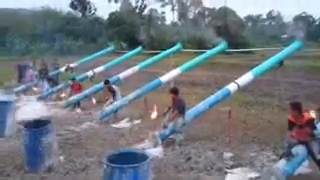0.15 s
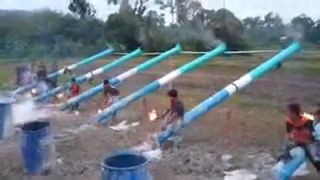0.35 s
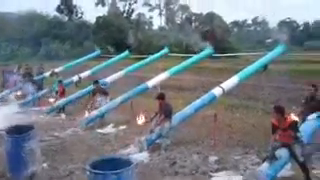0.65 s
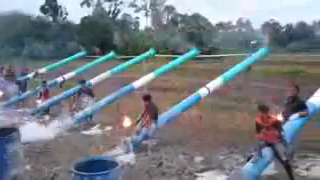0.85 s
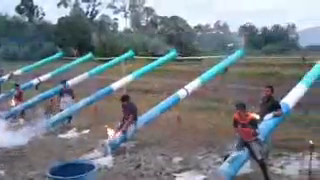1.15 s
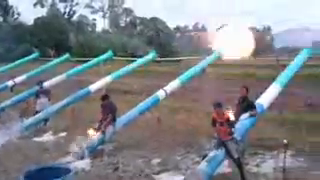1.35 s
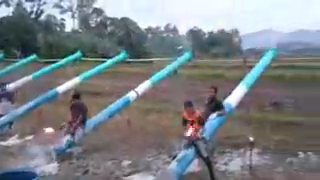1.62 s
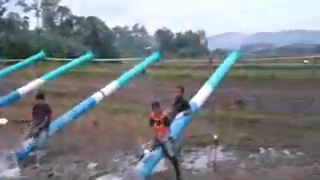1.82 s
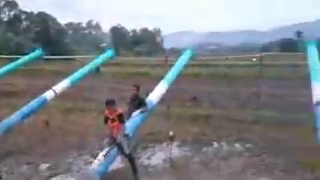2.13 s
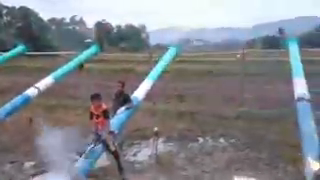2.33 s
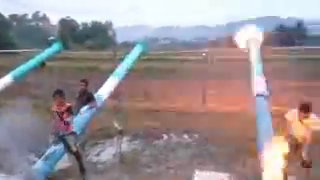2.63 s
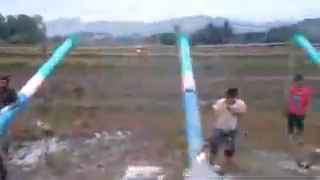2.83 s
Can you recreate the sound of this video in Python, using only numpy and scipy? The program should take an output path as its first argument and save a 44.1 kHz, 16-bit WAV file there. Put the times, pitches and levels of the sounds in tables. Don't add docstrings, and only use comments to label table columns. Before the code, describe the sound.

Booming shots from a row of homemade cannons, with sharp cracks, hissing ignition and rolling echoes outdoors.

```python
import sys
import numpy as np
from scipy import signal
from scipy.fft import rfft, irfft
from scipy.io import wavfile
from scipy.ndimage import uniform_filter1d

SR = 44100
rng = np.random.default_rng(int(sys.argv[2]) if len(sys.argv) > 2 else 0)


def volts_from_db(level):
    exponent = np.asarray(level, float) / 20
    return 10 ** exponent


def dump_mix(stems):
    frames = np.atleast_2d(stems).T
    limited = np.clip(frames, -1, 1)
    pcm = np.round(limited * 32767).astype(np.int16)
    wavfile.write(sys.argv[1], SR, pcm)


N = 131418

# f/Hz, level/dB per Hz
FIELD_SPECTRUM = [(260, -34), (450, -8), (523, -7.5), (1510, -14.5), (4010, -17), (6640, -21), (9090, -19),
                  (11800, -47.5), (20000, -120)]
# f/Hz, level/dB per Hz
RUMBLE_SPECTRUM = [(15, -45), (25, -6.5), (107, 5.5), (131, -8), (152, -4.5), (230, -20), (254, -34),
                   (284, -39.5), (500, -28), (650, -44.5), (1100, -120)]
# t/s, level/dB
RUMBLE_LEVEL = [(0, -16), (.17, -24.5), (.3, -24), (.45, -21.5), (.8, -23.5), (.95, -19), (1.15, -27),
                (1.3, -24), (1.53, -19), (1.72, -24.5), (1.86, -23.5), (2.18, -19), (2.36, -26.5),
                (2.42, -20), (2.6, -27), (2.8, -18.5), (2.98, -26)]
# t/s, peak level/dB, f/Hz, length/s
BOOMS = [(0.0409, -7, 108, 0.005), (0.0607, -11, 104, 0.0039), (0.1044, -4.5, 112, 0.0082),
         (0.1187, -10, 130, 0.0082), (0.1399, -8, 104, 0.0057), (0.3744, -13.5, 90, 0.0067),
         (0.4023, -15, 99, 0.0096), (0.4433, -14.5, 94, 0.0088), (0.4752, -6, 97, 0.0067),
         (0.4936, -8.5, 99, 0.0027), (0.5123, -5.5, 92, 0.0067), (0.5297, -15, 114, 0.0039),
         (0.6027, -12, 104, 0.01), (0.6402, -10.5, 97, 0.005), (0.6837, -12, 107, 0.019),
         (0.7401, -16.5, 112, 0.052), (0.773, -10, 94, 0.008), (0.9663, -15, 98, 0.0063),
         (1.0001, -16, 110, 0.0036), (1.0126, -6, 116, 0.0084), (1.0591, -13.5, 112, 0.014),
         (1.1792, -14, 98, 0.0099), (1.2495, -17, 106, 0.0061), (1.3641, -10, 118, 0.0074),
         (1.391, -11, 101, 0.0027), (1.4305, -3.5, 99, 0.005), (1.4975, -8.5, 97, 0.0039),
         (1.5304, -21, 92, 0.0032), (1.5632, -10, 116, 0.0048), (1.5948, -10.5, 112, 0.0035),
         (1.6211, -7, 122, 0.013), (1.8962, -13, 104, 0.0096), (2.0406, -3.5, 102, 0.0052),
         (2.0691, -10.5, 94, 0.02), (2.1778, -9, 100, 0.009), (2.2685, -8.5, 88, 0.0057),
         (2.3194, -8.5, 98, 0.0062), (2.3578, -10.5, 93, 0.0087), (2.4772, -7.5, 121, 0.015),
         (2.6373, -13, 114, 0.0079), (2.8947, -12, 133, 0.0092), (2.9196, -4.5, 122, 0.0047)]
# t/s, level/dB, hold/s
VOLLEYS = [
    (0.001, -45, .02),
    (.56, -43, 0.2),
    (1.38, -44.5, 0.037),
    (2.149, -36, 0.24),
    (2.722, -33, 0.067),
]
# f/Hz, level/dB per Hz
ECHO_SPECTRUM = [(180, -30), (300, -8), (677, -2.5), (1290, -9.5), (1420, -10.5), (2210, -10), (7440, -21),
                 (8590, -34), (9090, -51), (11800, -83), (20000, -120)]
# t/s, peak level/dB, f/Hz
POPS = [(0.003, -8.5, 605), (0.4585, -9.5, 940), (0.491, -15.5, 760), (0.5605, -9.5, 720),
        (0.5885, -12.5, 800), (0.631, -9.5, 704), (0.657, -10.5, 780), (0.7315, -12, 800),
        (0.783, -10.5, 686), (0.927, -13, 800), (1.374, -10, 590), (1.4795, -13, 680), (1.505, -11, 880),
        (1.9825, -10.5, 990), (2.014, -13.5, 900), (2.087, -18, 600), (2.157, -12, 710), (2.186, -9.5, 910),
        (2.258, -7.5, 1290), (2.2615, -16, 1320), (2.308, -11, 710), (2.777, -9.5, 930)]
# t/s, peak level/dB, f/Hz
SPITS = [
    (2.3692, -2.5, 895),
    (2.3716, -6, 1000),
]
# start t/s, end t/s, level/dB, rise/dB
JETS = [
    (0.02, 0.031, -24.5, 7),
    (0.915, 0.941, -21.5, 15.5),
    (1.515, 1.542, -23.5, 14),
    (2.369, 2.375, -23.5, -3.5),
    (2.382, 2.407, -26.5, -4),
    (2.788, 2.802, -23, 15),
]
# f/Hz, level/dB per Hz
JET_SPECTRUM = [(470, -29), (800, 2), (2600, -8), (4890, -6.5), (7120, -2), (9090, -6), (11800, -44),
                (20000, -120)]
# t/s, roar level/dB, hold/s, echo level/dB
SHOTS = [
    (-.42, -19.5, .04, -32.5),
    (0.047, -16, 0.016, -30),
    (0.954, -15, 0.025, -30.5),
    (1.551, -16.5, 0.018, -31.5),
    (2.402, -15.5, 0.037, -31.5),
    (2.817, -16, 0.035, -34.5),
]
# f/Hz, level/dB per Hz
ROAR_SPECTRUM = [(82, -27), (140, -4.5), (281, -5), (528, -10), (686, -7), (1590, -17), (1920, -16.5),
                 (7240, -24.5), (9090, -44.5), (11800, -73.5), (20000, -120)]
# f/Hz, rise/s
ROAR_RISE = [(150, .04), (280, .022), (600, .003), (8000, .002)]
# f/Hz, hold/s
ROAR_LINGER = [(150, 0.023), (280, 0.034), (700, 0.021), (8000, 0.0038)]
# f/Hz, t60/s
ROAR_FADE = [(150, 0.34), (280, 0.29), (700, 0.19), (2500, 0.21), (8000, 0.31)]
# f/Hz, level/dB
TAIL_LEVEL = [(150, -6), (300, -11.5), (700, -25), (8000, -20.5)]
# f/Hz, t60/s
TAIL_FADE = [(300, 3.3), (700, 0.75), (8000, 1.6)]
# t/s, peak level/dB, f/Hz, length/s
THUDS = [(0.0685, -12, 295, 0.0015), (0.0812, -10, 278, 0.0036), (0.089, -4, 260, 0.0015),
         (0.1001, -4.5, 217, 0.0014), (0.1048, -14, 233, 0.0014), (0.1063, -9, 238, 0.0016),
         (0.1113, -8, 233, 0.001), (0.975, -14.5, 323, 0.0019), (0.997, -7.5, 222, 0.003),
         (1.0199, -18, 221, 0.0027), (1.0359, -16, 270, 0.0013), (1.0419, -13.5, 240, 0.0041),
         (1.555, -7, 316, 0.0014), (1.5909, -12, 274, 0.0017), (1.5976, -3.5, 271, 0.00091),
         (1.6028, -6.5, 284, 0.0018), (1.6079, -8, 290, 0.00099), (2.3744, -4.5, 250, 0.0025),
         (2.406, -10.5, 348, 0.0012), (2.436, -14, 230, 0.003), (2.449, -6.5, 248, 0.0029),
         (2.464, -18, 303, 0.00092), (2.5, -7, 262, 0.0025), (2.8546, -11, 271, 0.001),
         (2.867, -13, 265, 0.0038), (2.878, -11, 288, 0.0021), (2.89, -9, 267, 0.0015),
         (2.8957, -8.5, 267, 0.0042)]
# t/s, peak level/dB, f/Hz
CRACKS = [(.051, -17, 880), (.0757, -7.5, 820), (.0866, -13, 860), (.9566, -7.5, 780), (.9618, -15, 830),
          (.9744, -15, 857), (.9851, -4, 705), (.9879, -11, 760), (1.5523, -8, 910), (1.5588, -2.5, 714),
          (1.5682, -7, 920), (1.5714, -12, 841), (2.3754, -8, 342), (2.4067, 0, 640), (2.411, -14, 795),
          (2.4325, -9, 910), (2.4507, -21, 900), (2.8216, -4, 820), (2.8251, -13, 1033)]
# t/s, length/s, level/dB
LULLS = [
    (0.04, .008, 0.5),
    (0.96, 0.01, 1),
    (1.55, 0.01, -8),
    (2.357, .022, -2),
    (2.3686, 0.0086, -9),
    (2.805, 0.0033, -11),
]
# t/s, level/dB
OVERLOADS = [
    (.9953, -35),
    (2.376, -35),
    (2.4075, -52),
]
# low f/Hz, high f/Hz, limit level/dB re usual
STRIPS = [(7950, 8200, -4), (8200, 8450, -8), (8450, 8750, -6), (8750, 9500, 0)]


def at_hz(points, hz):
    table_hz, values = np.transpose(points)
    return np.interp(np.log(hz), np.log(table_hz), values)


def rms_one(x):
    return x / np.sqrt(np.mean(x ** 2) + 1e-20)


def drift(rate):
    r = np.exp(-80 * np.pi * rate / SR)
    white = rng.standard_normal(N // 40 + 1002)
    slow = signal.lfilter([1], [1, -2 * r, r * r], white)[1000:]
    return np.interp(np.arange(N) / 40, np.arange(len(slow)), rms_one(slow))


def bands(spectrum, patchy_db, rate):
    edges = 24 * 2 ** np.arange(0, 9.1, .5)
    centres = np.sqrt(edges[1:] * edges[:-1])
    low, high = spectrum[0][0], spectrum[-1][0]
    inside = (centres > low / 1.2) * (centres < high * 1.2)
    gains = volts_from_db(at_hz(spectrum, centres)) * np.sqrt(np.diff(edges)) * inside
    gains = gains / np.sqrt(np.sum(gains ** 2))
    white, together = rng.standard_normal((2, N)), drift(rate)
    for k, hz in enumerate(centres):
        if gains[k] > 0:
            band_pass = signal.butter(2, edges[k:k + 2], "band", fs=SR, output="sos")
            band = rms_one(signal.sosfilt(band_pass, white[k % 2]))
            flicker = volts_from_db(patchy_db * (0.55 * together + 1.09 * drift(rate)))
            yield hz, gains[k] * band * flicker


def swell(t, rise_s, hold_s, t60):
    falling = np.clip(t - rise_s - hold_s, 0, None)
    return np.clip(t / rise_s, 0, 1) * volts_from_db(-60 * falling / t60)


def field():
    return volts_from_db(-40.5) * sum(band for _, band in bands(FIELD_SPECTRUM, 0.56, 20.5))


def rumble(t):
    level = volts_from_db(np.interp(t, *np.transpose(RUMBLE_LEVEL)))
    return level * sum(band for _, band in bands(RUMBLE_SPECTRUM, 2, 28.0))


def bursts(t, rows):
    out = np.zeros(N)
    for s, db, hz, length in rows:
        near = slice(max(int((s - 5 * length) * SR), 0), int((s + 5 * length) * SR))
        since = t[near] - s
        width = np.where(since < 0, 0.7 * length, length)
        out[near] += volts_from_db(db) * np.cos(2 * np.pi * hz * since) * np.exp(-(since / width) ** 2 / 2)
    return out


def crackle():
    per_s, spread_db = 81, 2.5
    sizes = volts_from_db(spread_db * np.minimum(rng.exponential(1, N), 3)) * (rng.random(N) < per_s / SR)
    dealt, out = rng.integers(0, 8, N), 0
    for k, hz in enumerate(np.geomspace(380, 1500, 8)):
        r, w = volts_from_db(-60 * hz / (9.0 * SR)), 2 * np.pi * hz / SR
        hits = sizes * (dealt == k) + 1e-18
        out = out + signal.lfilter([0, np.sin(w)], [1, -2 * r * np.cos(w), r * r], hits)
    return rms_one(out)


def echoes(t):
    trees_s, trees_rise_s, trees_t60_s = .277, .003, 4.0
    hills_s, hills_rise_s, hills_t60_s = 0.38, 0.049, 3.5
    hills_db, hills_tilt_db, crackle_db = -3.5, -4.5, -6
    starts = np.array([row[0] for row in SHOTS] + [np.inf])
    trees, hills = 0, 0
    for k, (s, _, _, db) in enumerate(SHOTS):
        heard = np.clip((starts[k + 1] + 0.13 - t) / 0.047, 0, 1)
        trees = trees + volts_from_db(db) * heard * swell(t - s - trees_s, trees_rise_s, 0.076, trees_t60_s)
        hills = hills + volts_from_db(db + hills_db) * heard * swell(t - s - hills_s, hills_rise_s, 0.29, hills_t60_s)
    volleys = sum(volts_from_db(db) * swell(t - s, 0.016, hold, 0.23) for s, db, hold in VOLLEYS)
    trees = np.hypot(trees, volleys)
    out = volts_from_db(crackle_db) * hills * crackle()
    for hz, band in bands(ECHO_SPECTRUM, 1.5, 79.0):
        dull_hills = hills * volts_from_db(hills_tilt_db * np.log2(hz / 1000))
        out = out + band * np.hypot(trees, dull_hills)
    return out


def pops():
    lag_s, rise_s, cycles, level_db = .002, 0.00067, 1.87, 3
    puff_db, puff_s = -14, 0.0065
    out, t = np.zeros(N + 2000), np.arange(2000) / SR
    rows = list(POPS) + list(SPITS)
    puffs = signal.lfilter([.12], np.poly([.7, .6]), rng.standard_normal((len(rows), 2000)))
    for (s, db, hz), puff in zip(rows, puffs):
        push = np.sin(2 * np.pi * hz * t) * volts_from_db(-60 * t * hz / (2.9 * cycles))
        breath = volts_from_db(puff_db) * puff * np.exp(-t / puff_s)
        report = volts_from_db(db + level_db) * np.minimum(t / rise_s, 1) * (push + breath)
        out[int((s + lag_s) * SR):][:2000] += report
    return out[:N]


def jets(t):
    shape = 0
    for s, end, db, rise_db in JETS:
        growth = volts_from_db(db - rise_db * np.clip((end - t) / (end - s), 0, 1))
        onset = np.clip((t - s) / 0.0083, 0, 1)
        fall = np.exp(-np.clip(t - end, 0, None) / 0.01)
        shape = shape + growth * onset * fall
    return shape * sum(band for _, band in bands(JET_SPECTRUM, 1.0, 80.0))


def roar(t):
    out, coarse = 0, t[::16]
    for hz, band in bands(ROAR_SPECTRUM, 1.2, 98.0):
        rise, linger, fade = at_hz(ROAR_RISE, hz), at_hz(ROAR_LINGER, hz), at_hz(ROAR_FADE, hz)
        tail_gain, tail_fade = volts_from_db(at_hz(TAIL_LEVEL, hz)), at_hz(TAIL_FADE, hz)
        shape = 0
        for s, db, hold, _ in SHOTS:
            blast = swell(coarse - s, rise, hold + linger, fade)
            tail = tail_gain * swell(coarse - s, .03, 0, tail_fade)
            shape = shape + volts_from_db(db) * (blast + tail)
        out = out + band * np.interp(t, coarse, shape)
    return out


def cracks(t):
    return bursts(t, [(s, db, hz, 0.45 / hz) for s, db, hz in CRACKS])


def lulls(t):
    return volts_from_db(sum(db * np.clip((t - s + length) / .005, 0, 1) * (t < s) for s, length, db in LULLS))


def scene():
    t = np.arange(N) / SR
    air_loss = signal.cheby1(4, 1, 7500, fs=SR, output="sos")
    far = signal.sosfilt(air_loss, echoes(t) + field())
    ducked = far + rumble(t) + bursts(t, list(BOOMS) + list(THUDS)) + jets(t)
    return (lulls(t) * ducked + pops() + cracks(t) + roar(t))[None]


def drop_strips(x):
    block, whim_db = 1024, 6
    spectrum, hz, out = rfft(x), np.arange(N // 2 + 1) * SR / N, x.copy()
    for low, high, db in STRIPS:
        strip = irfft(spectrum * (hz >= low) * (hz < high), N)
        level = np.sqrt(uniform_filter1d(strip ** 2, size=4 * block) + 1e-18)
        limit = np.median(level) * volts_from_db(db + whim_db * drift(4.0))
        faint = (level < limit)[np.arange(N) // block * block]
        fade = uniform_filter1d(faint * 1., size=block // 2)
        out = out - strip * uniform_filter1d(fade, size=block // 2)
    return out


def low_pass(x):
    return signal.sosfilt(signal.butter(12, 15800, fs=SR, output="sos"), x)


def record(dry):
    presence_hz, presence_width_hz, presence_db = 2180, 730, -8
    top, clip, cutoff_hz = .8, .76, 9300
    bass_cut = signal.butter(4, 41, "high", fs=SR, output="sos")
    x = signal.sosfiltfilt(bass_cut, dry)
    peak = signal.iirpeak(presence_hz, presence_hz / presence_width_hz, fs=SR)
    x = x + volts_from_db(presence_db) * signal.lfilter(*peak, x)
    treble_cut = signal.cheby2(20, 90, cutoff_hz + 300, fs=SR, output="sos")
    x = signal.sosfilt(treble_cut, top * np.tanh(x / top))
    x = np.clip(drop_strips(x[0]), -clip, clip)[None]
    for s, db in OVERLOADS:
        x[:, int(s * SR)] -= volts_from_db(db)
    return low_pass(x)


dry = scene()
out = record(dry)
dump_mix(out)
```